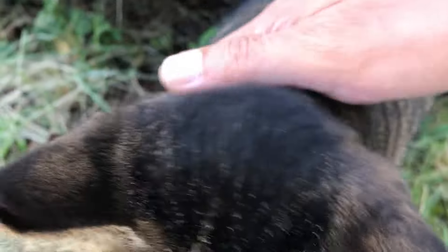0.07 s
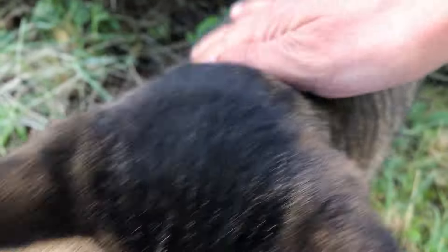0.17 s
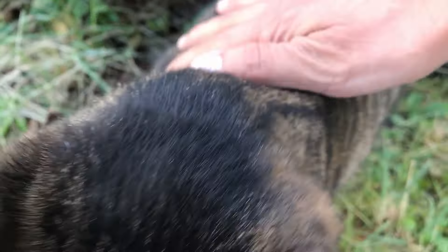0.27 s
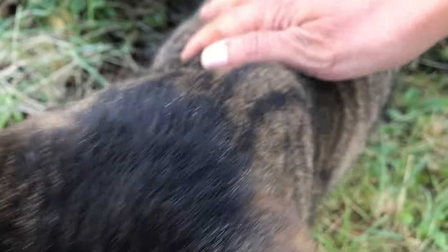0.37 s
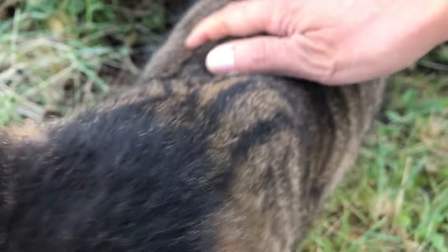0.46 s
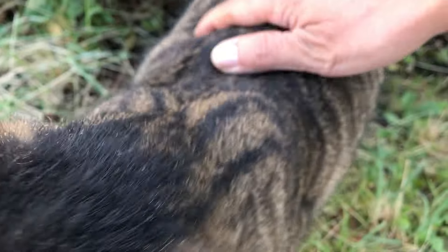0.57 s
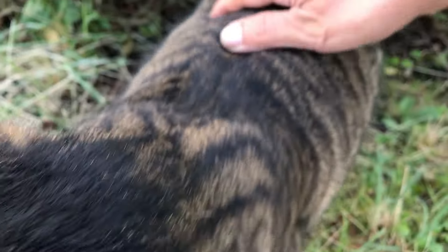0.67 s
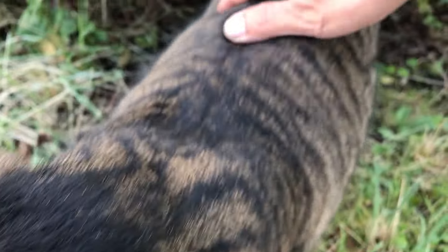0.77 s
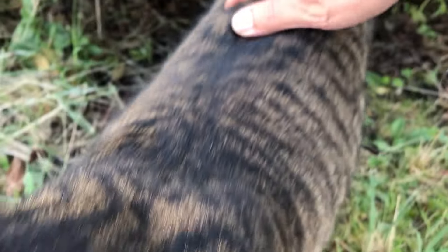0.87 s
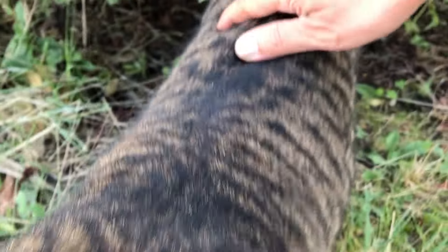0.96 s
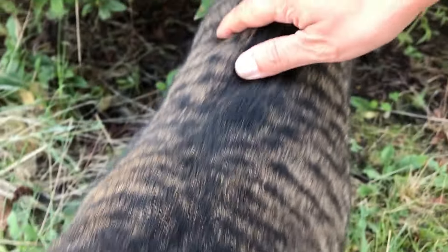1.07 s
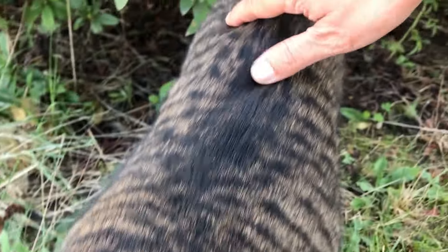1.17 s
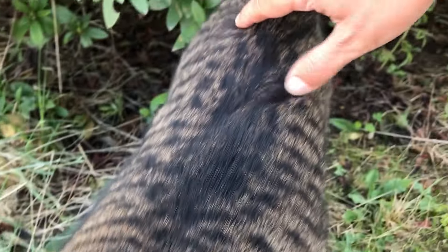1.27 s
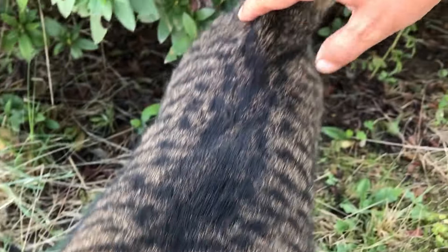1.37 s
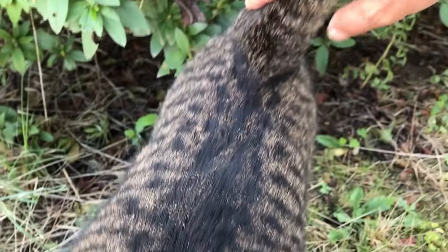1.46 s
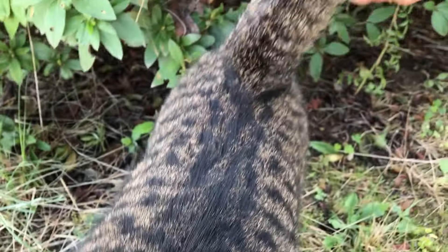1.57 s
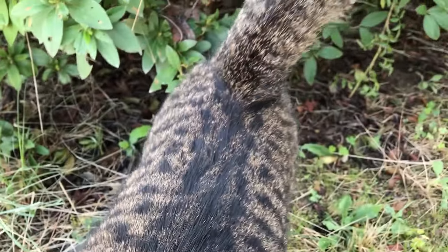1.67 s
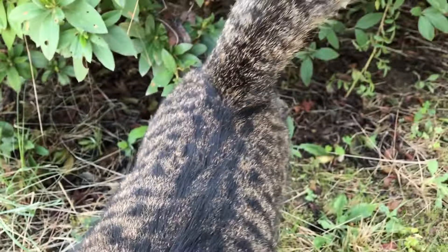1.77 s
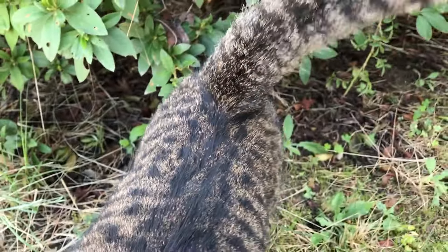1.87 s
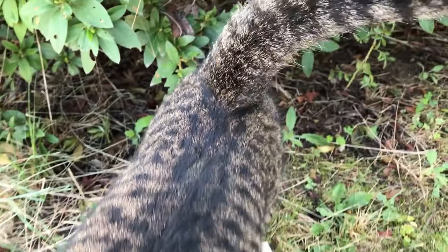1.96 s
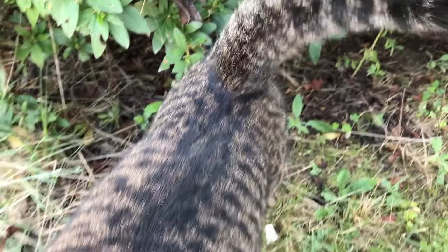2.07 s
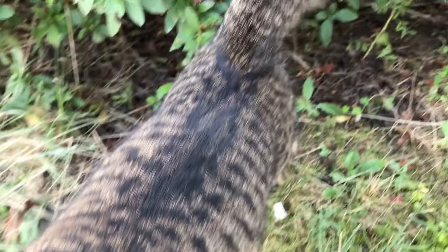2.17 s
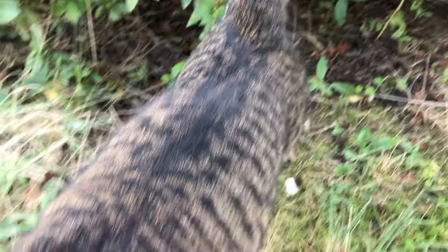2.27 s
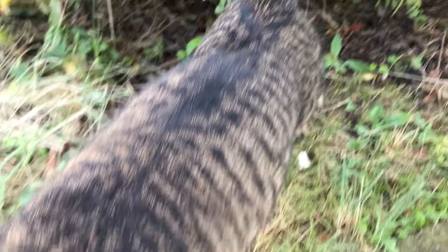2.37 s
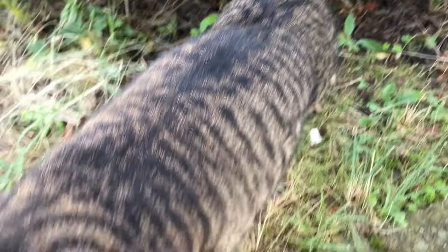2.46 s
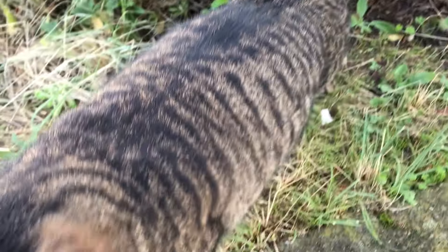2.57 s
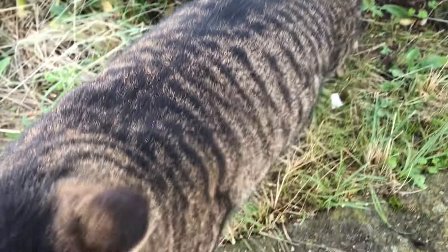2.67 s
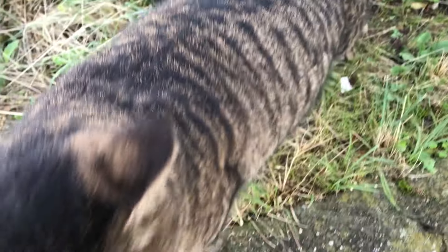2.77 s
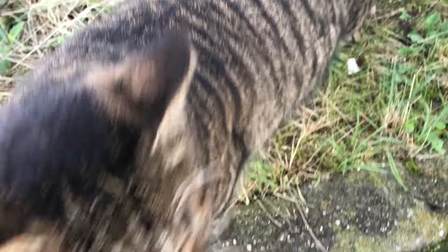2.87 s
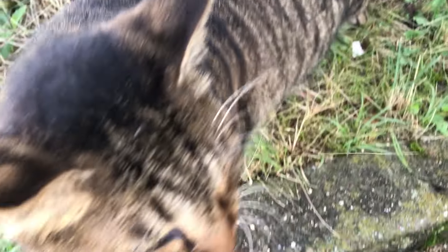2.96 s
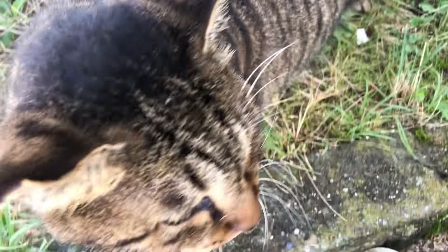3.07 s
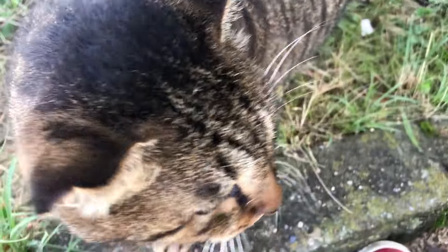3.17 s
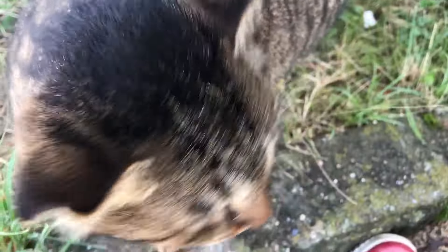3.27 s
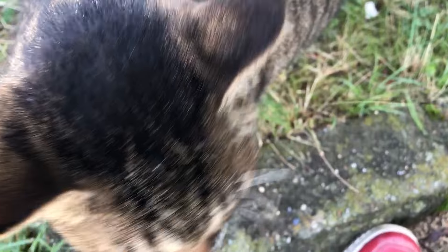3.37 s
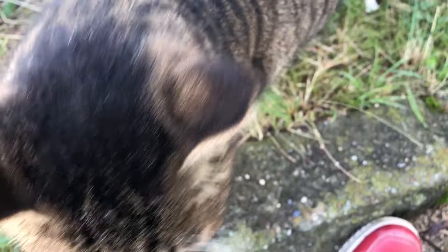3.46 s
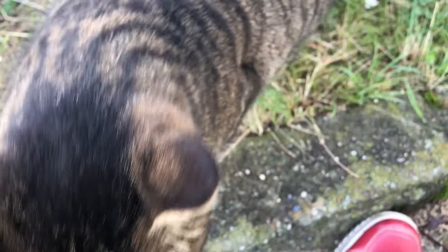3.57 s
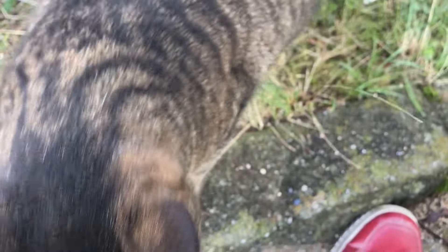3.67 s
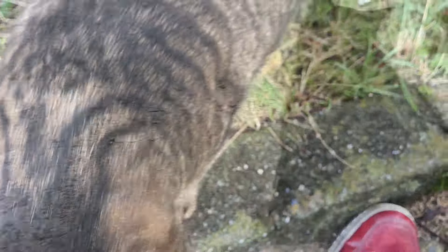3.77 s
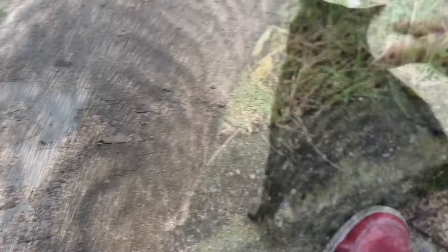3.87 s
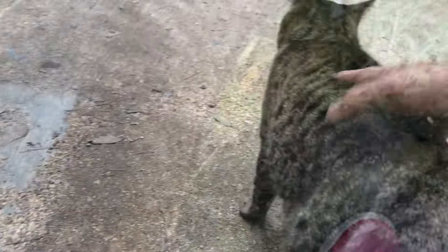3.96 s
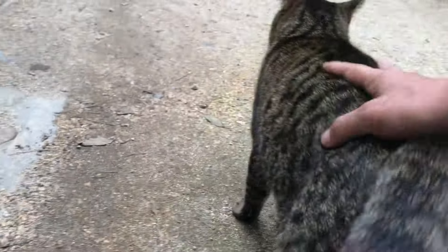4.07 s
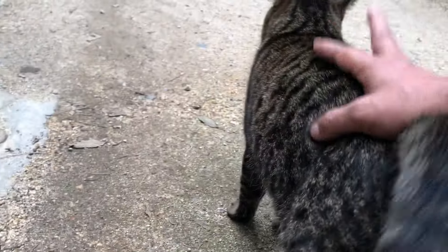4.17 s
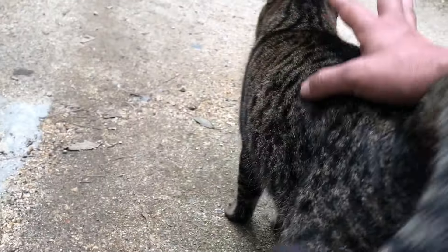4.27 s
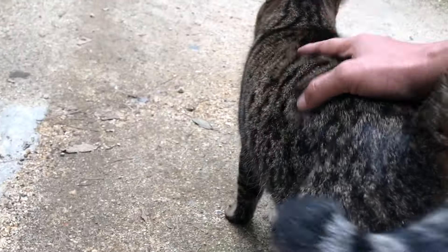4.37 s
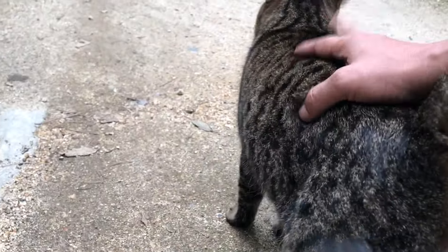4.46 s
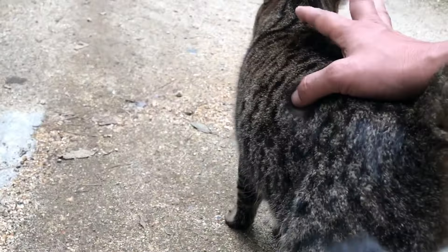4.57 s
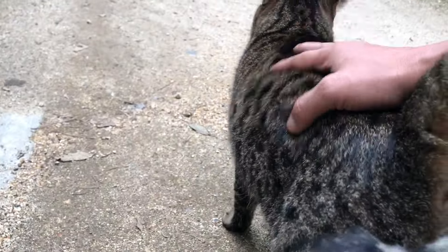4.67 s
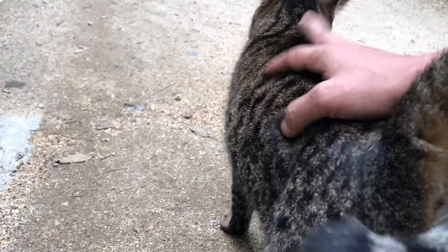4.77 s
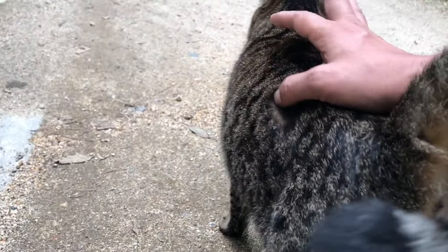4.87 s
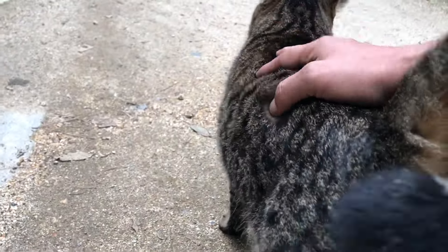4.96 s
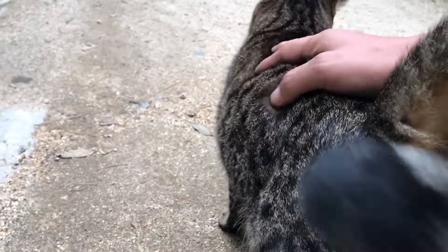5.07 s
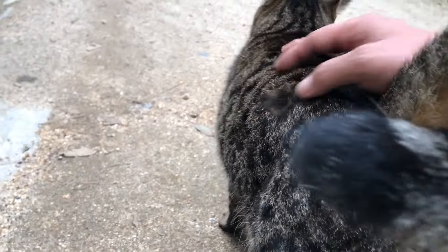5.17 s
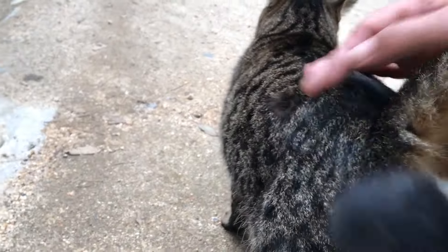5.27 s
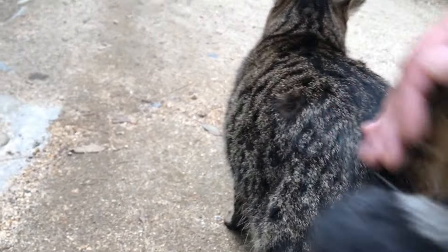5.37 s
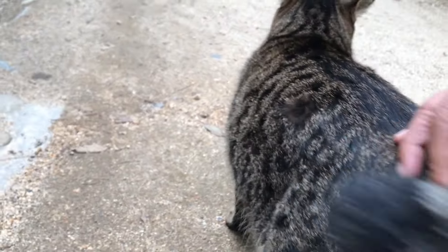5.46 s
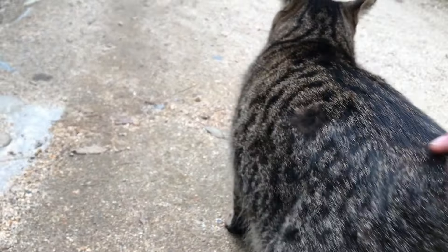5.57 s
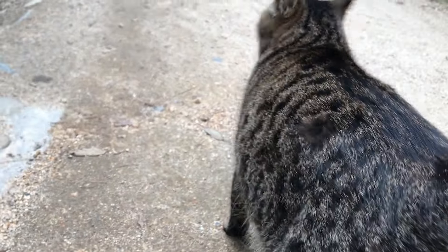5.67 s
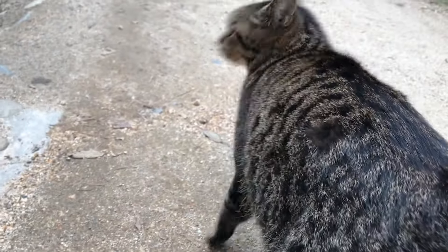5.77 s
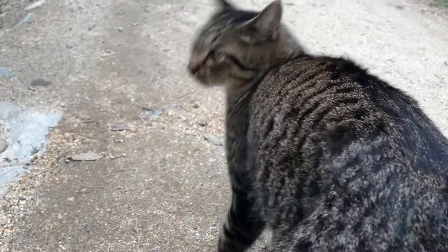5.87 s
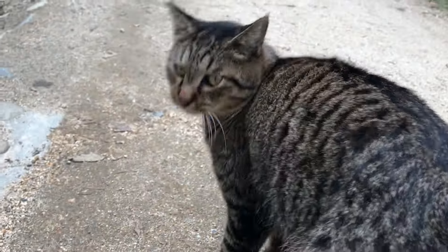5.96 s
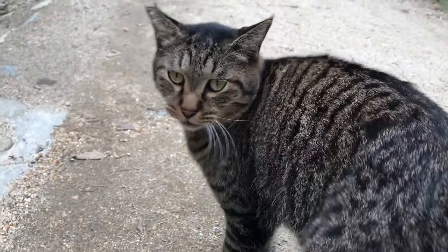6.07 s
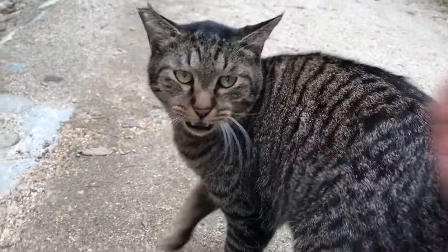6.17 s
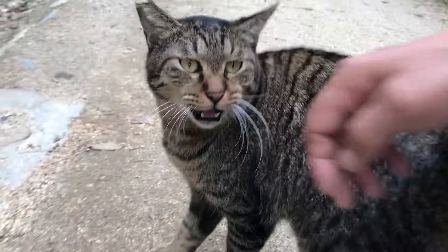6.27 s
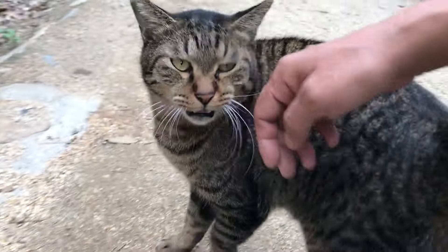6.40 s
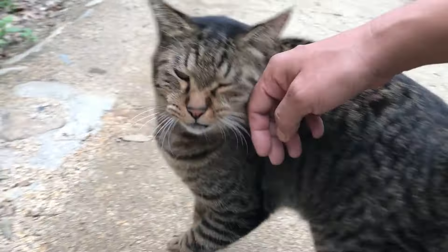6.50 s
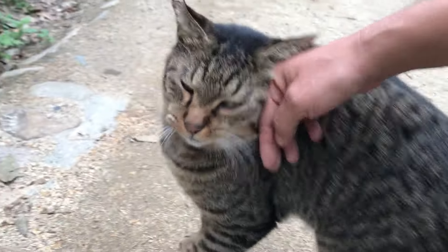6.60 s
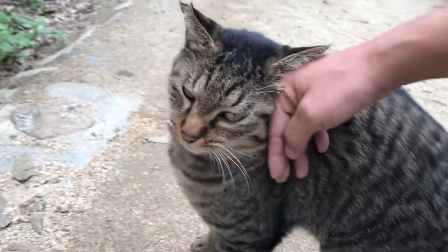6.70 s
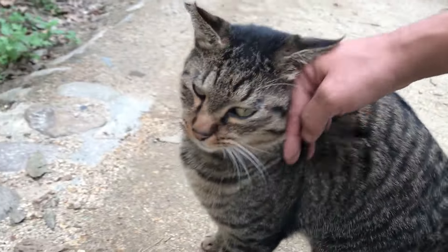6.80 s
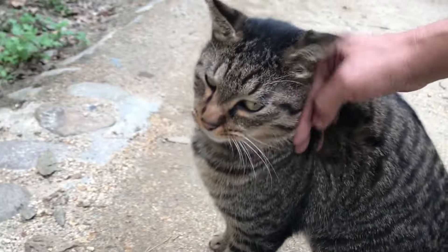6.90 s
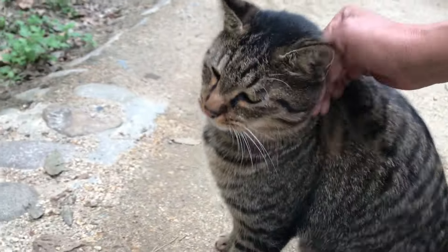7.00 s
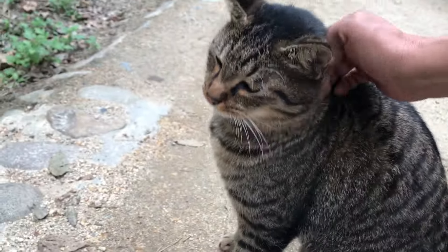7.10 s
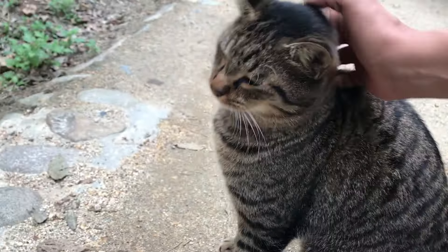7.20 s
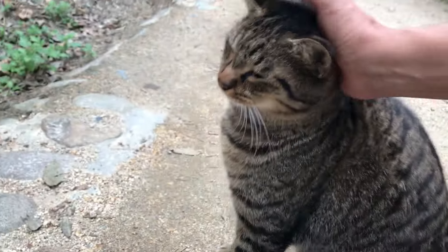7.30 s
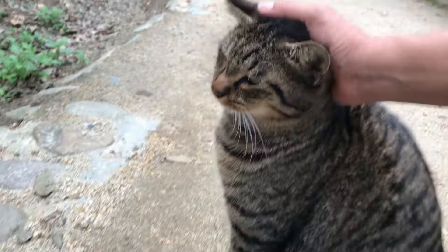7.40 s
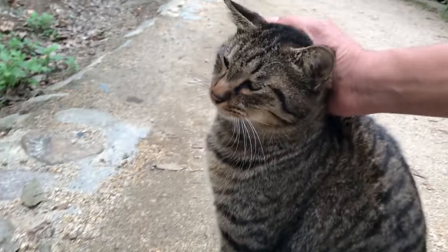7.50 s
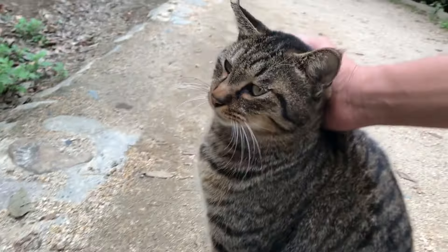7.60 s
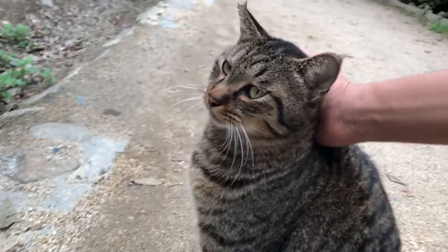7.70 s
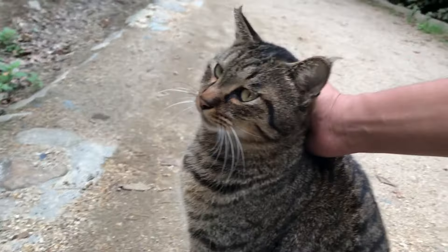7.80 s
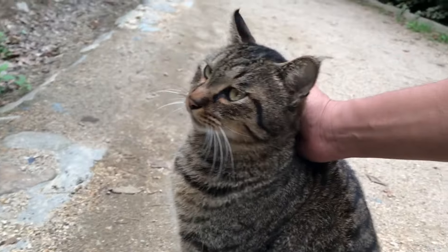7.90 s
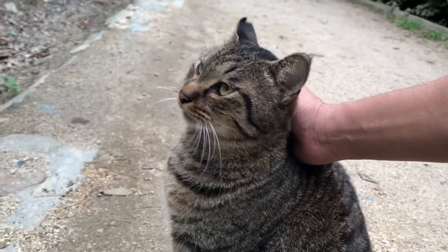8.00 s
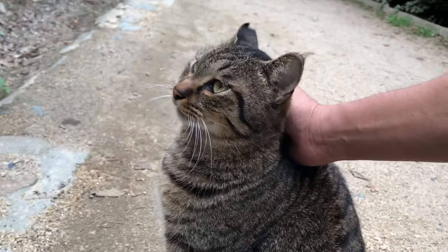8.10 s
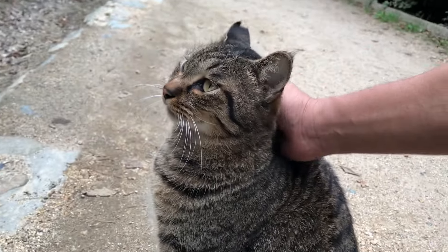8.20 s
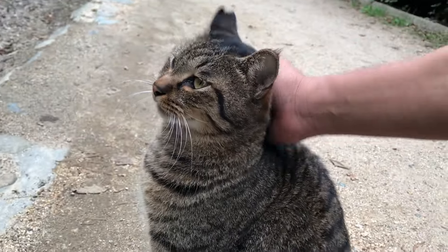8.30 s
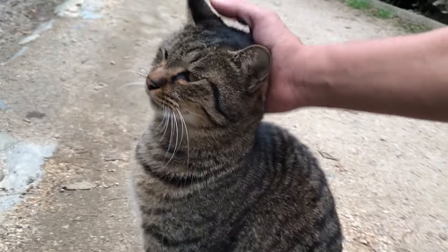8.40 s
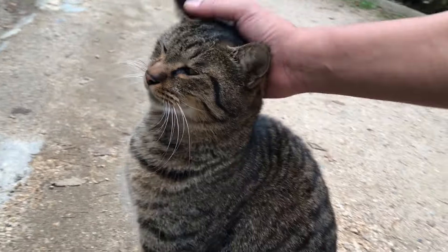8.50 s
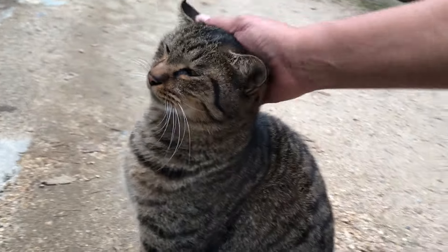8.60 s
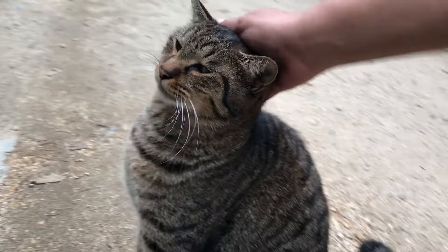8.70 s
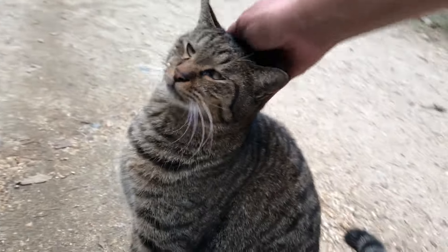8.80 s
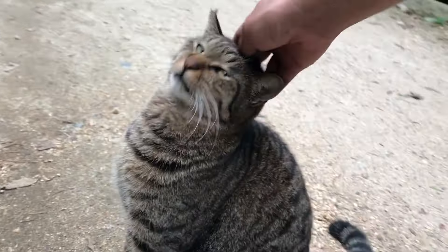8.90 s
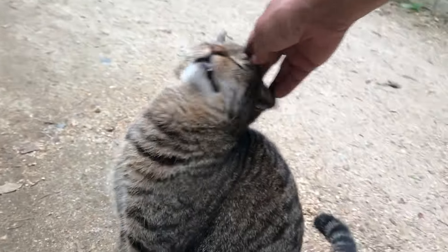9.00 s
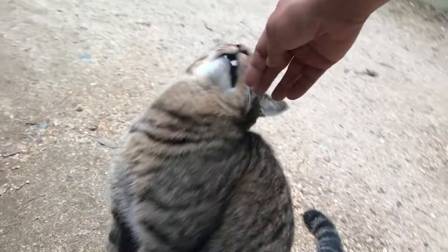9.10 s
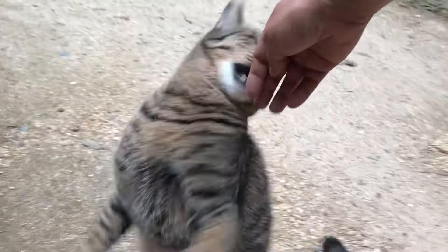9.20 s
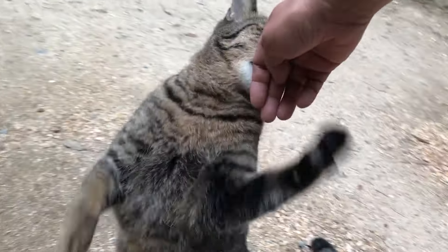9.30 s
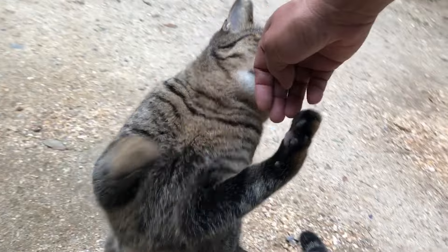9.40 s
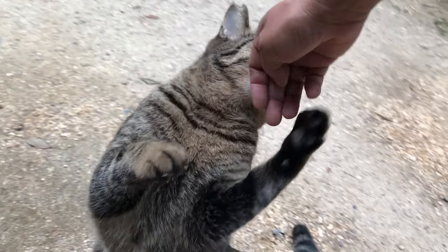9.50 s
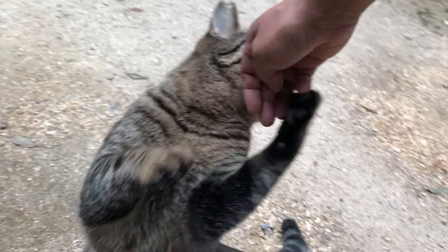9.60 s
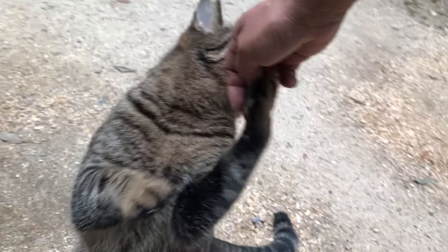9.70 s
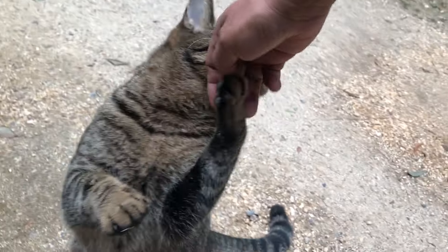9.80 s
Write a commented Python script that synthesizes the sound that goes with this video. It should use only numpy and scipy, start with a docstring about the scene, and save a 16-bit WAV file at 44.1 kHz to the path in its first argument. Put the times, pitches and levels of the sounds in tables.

```python
"""A cat meows close to a phone on a grass verge, over distant traffic, while a hand strokes it and stalks rustle.
Far insects chirp as narrow noise before and into the second, longest call, which has a brief early trill.
Between 3.5 and 4 s the background turns to a gravel path; grit crunches as gated noise and snaps, densest near 4.5 s.
A third, trilled call follows near 6 s, then more crunches and snaps to the end.
Each call is a harmonic stack shaped by a mouth that opens and closes, roughened by breath noise."""
import sys
import numpy as np
from scipy import signal
from scipy.fft import rfft, irfft
from scipy.io import wavfile
from scipy.ndimage import uniform_filter1d

SR = 44100
rng = np.random.default_rng(int(sys.argv[2]) if len(sys.argv) > 2 else 0)


def generate_wav(signal):
    """Clip the signal to [-1, 1] and save it as 16-bit WAV at the path in sys.argv[1]."""
    frames = np.transpose(np.atleast_2d(signal))
    scaled = np.clip(frames, -1, 1) * 32767
    pcm = np.round(scaled).astype(np.int16)
    wavfile.write(sys.argv[1], SR, pcm)


N = 434385

# Colour of the verge background: (frequency [Hz], relative level per Hz [dB])
VERGE_COLOUR = [(15, -34), (25, 9.5), (74, 3.5), (293, -4.5), (560, -12), (624, -4.5), (840, -11),
                (1400, -19.5), (2690, -23), (4030, -26.5), (10400, -37), (12900, -37.5), (16000, -42)]
# Colour of the path background: (frequency [Hz], relative level per Hz [dB])
PATH_COLOUR = [(15, -25), (25, 9), (74, 0), (180, -2), (516, -30), (677, -23), (1480, -37), (2410, -34.5),
               (2760, -46.5), (5430, -38.5), (7510, -42.5), (14800, -61), (16000, -34)]
# Far traffic, with brief low thumps of handling near 3.07 and 4.39 s, before its random wander: (time [s],
# level [dB])
RUMBLE = [(0.0, -51.5), (0.5, -60), (1.9, -55.5), (2.4, -54), (2.98, -54), (3.07, -49.5), (3.14, -52),
          (4.09, -57), (4.39, -46.5), (4.46, -51.5), (5.1, -53), (5.9, -53.5), (7.4, -54.5), (7.7, -56.5),
          (8.7, -54), (9.85, -54.5)]
# Voice path of the cat, one table a call, levels before trill and shimmer:
# (time [s], pitch [Hz], fundamental [dB], mouth resonance [Hz], mouth [dB], throat [dB],
#  third resonance [dB], fourth resonance [dB])
CALLS = [
    [(0.0, 550, -43.5, 1610, -43, -42, -52.5, -64), (0.108, 555, -43, 1610, -39.5, -38, -47, -57.5),
     (0.238, 543, -45, 1590, -45, -46.5, -56, -63), (0.34, 538.4, -46.5, 1550, -45, -49.5, -58, -76),
     (0.37, 516, -50, 1200, -43, -48, -51, -65), (0.382, 492, -51, 950, -47, -51, -55, -70),
     (0.39, 441, -43.5, 890, -42, -45, -49, -69), (0.402, 429, -43.5, 880, -46, -59, -57, -68),
     (0.415, 428.4, -75, 897, -76, -82, -74, -76)],
    [(1.975, 380, -69, 849, -78, -89, -77, -80), (1.991, 379, -45, 866, -77, -78, -83, -86),
     (2.023, 492, -55.5, 1440, -59, -77, -76, -88), (2.05, 551, -47.5, 1640, -44, -54, -72, -84),
     (2.115, 625, -50, 1760, -50, -40.5, -65, -68), (2.157, 623, -48.5, 1710, -45, -40.5, -65, -62),
     (2.253, 630, -50.5, 1830, -47, -35, -58, -63), (2.385, 595, -48, 1765, -48.5, -42, -53, -59.5),
     (2.595, 552, -47.5, 1545, -48, -42.5, -50.5, -59), (2.881, 515.4, -44, 1380, -41, -38, -43, -52.5),
     (3.119, 516.3, -44.5, 1315, -40.5, -35.5, -44, -51.5),
     (3.201, 523.7, -46, 1328, -42.5, -37.5, -51, -52.5), (3.275, 509, -47, 1290, -41, -40, -51, -54),
     (3.331, 504.3, -52, 1370, -49, -42, -63, -80), (3.405, 481, -54, 1150, -44, -46, -65, -75),
     (3.428, 497, -56, 880, -58, -46, -62, -70), (3.447, 416, -39, 858, -41, -51, -69, -68),
     (3.47, 400, -69, 847, -85, -79, -68, -72)],
    [(5.9, 423, -60, 745, -46.5, -63, -76, -79), (5.952, 386, -49, 710, -39, -70, -63, -70),
     (6.012, 445, -55, 820, -43, -70, -76, -88), (6.03, 420, -55, 800, -34.5, -67, -66, -72),
     (6.07, 464, -53, 940, -40, -48, -65, -62), (6.13, 502, -49.5, 1290, -33.5, -37.5, -56, -56),
     (6.184, 535, -45, 1460, -42.5, -30.5, -58, -52), (6.27, 519.5, -48.5, 1400, -44.5, -34.5, -47, -51),
     (6.36, 508, -50.5, 1297, -38.5, -37, -46, -54), (6.412, 469, -57, 910, -45, -37.5, -43, -60),
     (6.43, 453, -55, 850, -41, -41, -50, -62), (6.44, 407, -44, 805, -37, -45, -54, -60),
     (6.456, 383, -42.5, 760, -39, -45, -55, -58), (6.47, 350, -63, 800, -86, -65, -76, -77)],
]
# Cat's posture, one row a call:
# (air leak [ratio], third resonance mouth shut [Hz], third mouth wide [Hz], fourth resonance [Hz])
POSTURE = [(.8, 3130, 3230, 4360), (.9, 3900, 3080, 4530), (.9, 3050, 3050, 5200)]
# Fifth and sixth resonances: (centre [Hz], width [Hz], level relative to the fourth [dB])
FAINT_RESONANCES = [(8060, 1500, -26), (12200, 2300, -29)]
# Runs of trill beats, depths before each beat's random force: (first beat [s], end [s],
#  pitch swing at start [relative], pitch swing at end [relative], dip at start [dB], dip at end [dB])
TRILL_RUNS = [(2.099, 2.15, 0.0069, 0.0044, 3.9, 3.8), (5.911, 6.014, 0.065, 0.082, 33, 3.7),
              (6.082, 6.436, 0.016, 0.017, 5.5, 2.8)]
# Movements of paws, shoes and hand, layer levels at mid-scuff before the rustle's trims:
# (start [s], end [s], stalks [dB], low crunch [dB], sharp crunch [dB], swell start to end [dB])
SCUFFS = [(0, .45, -65, -76, -62, -7.5), (0.126, 0.167, -52, -78, -72, -6),
          (3.369, 3.42, -49.5, -65, -68, 10), (3.438, 3.472, -49, -62, -64, 3),
          (3.65, 3.7, -47, -75, -58, 3), (3.69, 3.786, -40.5, -60, -52, -11.5),
          (3.805, 4.057, -49.5, -62.5, -60, 6.5), (4.07, 4.129, -59, -68, -62.5, -9),
          (4.152, 4.385, -68, -55, -57, 17), (4.369, 4.483, -53, -37.5, -38, -4),
          (4.492, 4.594, -51, -38, -38, 10), (4.6, 4.701, -47.5, -42.5, -41.5, -5),
          (4.71, 4.779, -45, -39, -38.5, -1), (4.79, 4.892, -70, -53, -55, -2),
          (4.875, 5.07, -72, -54, -58, -9), (5.07, 5.325, -67, -56.5, -57.5, 4),
          (5.594, 5.678, -76, -69, -61, -4.5), (5.755, 5.777, -80, -68, -75, -3),
          (6.432, 6.466, -76, -66, -57.5, -10), (6.666, 6.722, -61, -58.5, -63, -7),
          (6.808, 6.85, -60.5, -76, -63.5, -11), (6.955, 7.07, -72, -58, -62.5, -10),
          (7.169, 7.218, -54.5, -61, -59, -16), (7.242, 7.543, -83, -68.5, -69, -1),
          (8.223, 8.35, -74, -75, -73, 5), (8.407, 9.052, -75, -66.5, -62.5, 0.5),
          (9.036, 9.157, -50.5, -59.5, -53, 1.5), (9.173, 9.298, -72, -66, -73, 6),
          (9.327, 9.364, -50, -50, -54, -16), (9.366, 9.462, -64, -53.5, -53, -6),
          (9.63, 9.721, -57.5, -54.5, -59, 0.5), (9.735, 9.847, -69, -74, -63, -1)]
# Faint steady stirring, before the rustle's trims: (time [s], stalks level [dB], grit level [dB])
STIRRING = [(0, -71.5, -102), (2.2, -76.5, -86), (3.3, -71.5, -87), (3.6, -63, -68), (5.4, -73, -68),
            (5.8, -76, -70.5), (6.3, -71.5, -69), (7.1, -71, -67), (7.65, -77, -74.5), (8.2, -77, -72.5),
            (9.85, -67, -63)]
# Single breaks of grit and stalk:
# (time [s], crack peak [dB], knock pitch [Hz], knock tone peak [dB], fizz peak [dB])
SNAPS = [(.154, -44, 604, -70, -23.5), (1.1144, -66, 627, -65, -47), (3.125, -55, 600, -70, -36),
         (3.255, -62, 608, -70, -40), (3.338, -60, 600, -70, -35), (3.395, -36, 600, -70, -30),
         (3.4717, -33, 646, -45, -23.5), (3.5357, -54, 664, -61, -36.5), (3.6528, -51, 676, -58, -31.5),
         (3.6964, -38, 590, -41, -21), (3.878, -48, 1480, -50, -49), (3.9978, -39, 1180, -53, -20),
         (4.071, -20, 1190, -23.5, -42), (4.2651, -30, 1190, -59, -53), (4.2832, -37, 999, -50, -50),
         (4.3186, -49, 1200, -36.5, -51), (4.3314, -37, 1130, -43, -40), (4.372, -24, 1170, -27, -39),
         (4.3864, -24, 845, -24, -39), (4.403, -28, 1120, -23, -42), (4.4189, -36, 1080, -18.5, -39),
         (4.507, -22.5, 770, -20, -26), (4.534, -32, 800, -32, -40), (4.547, -23, 780, -28, -32),
         (4.5604, -21, 740, -21.5, -40), (4.586, -14.5, 896, -12.5, -19), (4.654, -22.5, 800, -22.5, -40),
         (4.6664, -35, 875, -40, -37), (4.688, -28, 848, -51, -44), (4.7247, -32, 706, -32, -44),
         (4.7696, -23, 660, -29, -43), (4.8259, -35, 581, -43, -58), (4.897, -39, 840, -43, -54),
         (5.0016, -22, 1550, -22, -27.5), (5.0203, -25, 708, -33, -27), (5.0463, -27, 750, -33, -49),
         (5.0572, -39, 556, -23.5, -54), (5.1064, -41, 705, -32, -55), (5.1522, -40, 880, -33.5, -55),
         (5.216, -33.5, 805, -52, -56), (5.421, -42.5, 638, -63, -57), (5.5388, -34, 636, -44.5, -34),
         (5.655, -41.5, 598, -63, -57), (5.7642, -39, 670, -45.5, -68), (5.864, -43.5, 890, -40, -46),
         (6.244, -51, 615, -60, -34.5), (6.5415, -49, 770, -66, -35), (6.5942, -42, 651, -64, -67),
         (6.648, -58, 676, -55, -32), (6.907, -55, 700, -64, -43), (6.9664, -50, 746, -43, -53),
         (6.984, -37, 634, -38, -57), (7.002, -33, 726, -35, -35), (7.0352, -38.5, 719, -53, -30),
         (7.064, -29, 800, -41, -44), (7.171, -35, 624, -50, -62), (7.197, -40, 789, -53, -53),
         (7.33, -63, 700, -52, -42), (8.2253, -65, 824, -57, -39), (8.294, -38.5, 778, -64, -54),
         (8.334, -39.5, 800, -44, -50), (8.411, -63, 716, -65, -36.5), (8.4632, -45, 1030, -56, -62),
         (8.554, -51, 1260, -41, -60), (8.575, -45, 1470, -42.5, -61), (8.852, -50, 810, -43, -59),
         (9.0563, -32, 496, -41, -47), (9.0684, -26.5, 603, -37, -53), (9.1162, -30, 1070, -59, -59),
         (9.1508, -32, 980, -43, -56), (9.329, -23, 625, -34, -59), (9.35, -34, 600, -50, -45),
         (9.3678, -28.5, 660, -21.5, -55), (9.461, -42, 619, -52, -59), (9.7941, -34, 807, -63, -56)]
# Insect chirps, levels before the soft edges: (start [s], end [s], centre [Hz], width [Hz], level [dB])
INSECTS = [(.9, 1.28, 4200, 400, -73), (1.92, 2.12, 3850, 450, -72), (.805, .845, 6250, 150, -77),
           (1.375, 1.415, 6250, 150, -79), (1.96, 2.0, 6250, 150, -75)]

MOVE_S = (3.5, 4.05)  # crossfade from verge to path
VERGE_DB, PATH_DB = -61.5, -64.5  # hush of the air at each place
HUM_HZ, HUM_DB = 70.2, -3.5  # a far engine heard from the path, dB relative to the path's bass
MOUTH_Q, THROAT_WIDTH_HZ = 2.76, 867  # mouth: centre over width
THIRD_WIDTH_HZ, FOURTH_WIDTH_HZ = 1010, 1500
MOUTH_SHUT_HZ, MOUTH_WIDE_HZ = 850, 1700
THROAT_SHUT_HZ, THROAT_WIDE_HZ = 2127, 2307
TRACT_TOP_HZ = 6300  # the four main resonances die away above this
FOLD_SLOPE_DB = 9  # fall of the bare fold pulses, times octaves squared
TRILL_BEAT_S, TRILL_JITTER_S, TRILL_SPREAD_DB = 0.033, 0.003, 3.5
SCUFF_ATTACK_S, SCUFF_RELEASE_S = 0.0052, 0.022
SNAP_T60_S = 0.013  # time for a snap's crack to fall 60 dB
TOP_HZ = 15900  # upper edge of the phone's pass band


def undb(db):
    """Turn decibels into amplitude."""
    return 10 ** (np.asarray(db) / 20)


def unit(x):
    """Scale a signal to rms 1."""
    return x / np.sqrt(np.mean(x ** 2))


def band(x, lo_hz, hi_hz, order=2):
    """Pass only the band between two frequencies."""
    return signal.sosfilt(signal.butter(order, [lo_hz, hi_hz], "band", fs=SR, output="sos"), x)


def walk(rate, size=N):
    """Random levels held 1 / rate s and slewed twice; spread near 1."""
    hold = int(SR / rate)
    steps = np.repeat(rng.standard_normal(size // hold + 1), hold)
    smooth = uniform_filter1d(uniform_filter1d(steps, hold), hold)
    return 1.84 * smooth[:size]


def columns(table, t):
    """Glide through a table's columns at times t."""
    s, *rest = np.transpose(table)
    return [np.interp(t, s, column) for column in rest]


def distance(colour):
    """Far noise of a given colour, split into bass and a rest that flickers; each rms 1."""
    hz, level_db = np.transpose(colour)
    f = np.fft.rfftfreq(N, 1 / SR) + 1
    spectrum = rfft(rng.standard_normal(N)) * undb(np.interp(np.log(f), np.log(hz), level_db))
    bass = irfft(spectrum / (1 + (f / 270) ** 6), N)
    rest = irfft(spectrum, N) - bass
    return unit(bass), unit(rest * undb(1.0 * walk(6)))


def surroundings():
    """Traffic rumble with a few low handling thumps, and the hush of the air, crossfaded at equal power from
    verge to path."""
    t = np.arange(N) / SR
    path = np.interp(t, MOVE_S, [0, 1])
    verge_gain, path_gain = np.sqrt(1 - path), np.sqrt(path)
    verge_bass, verge_hush = distance(VERGE_COLOUR)
    path_bass, path_hush = distance(PATH_COLOUR)
    hum = undb(HUM_DB) * unit(band(rng.standard_normal(N), HUM_HZ - 5, HUM_HZ + 5))
    rumble = verge_gain * verge_bass + path_gain * (path_bass + hum)
    rumble *= undb(columns(RUMBLE, t)[0] + 1.03 * walk(12))
    return rumble + verge_gain * verge_hush * undb(VERGE_DB) + path_gain * path_hush * undb(PATH_DB)


def peak(hz, centre_hz, width):
    """Power response of a steep resonance, 1 at the centre."""
    return (1 + ((hz / centre_hz - centre_hz / hz) * centre_hz / width) ** 2) ** -3


def trill(t, swing_s=0.0067, dip_s=0.0024):
    """At each beat, never quite even, the pitch climbs, then drops through a short dip in level."""
    bend, dip_db = np.ones(len(t)), np.zeros(len(t))
    for start, end, first_swing, last_swing, first_db, last_db in TRILL_RUNS:
        for beat in np.arange(start, end, TRILL_BEAT_S):
            late, force = rng.uniform(-1.2, 1, 2)
            s, force = beat + TRILL_JITTER_S * late, undb(TRILL_SPREAD_DB * force)
            swing = force * np.interp(s, [start, end], [first_swing, last_swing])
            depth_db = force * np.interp(s, [start, end], [first_db, last_db])
            u = (t - s) / swing_s
            bend -= swing * 2.3 * u * np.exp(-u ** 2 / 2)
            dip_db -= depth_db * np.exp(-((t - s) / dip_s) ** 2 / 2)
    return bend, dip_db


def meow(table, hoarse, third_shut_hz, third_wide_hz, fourth_hz, count=27):
    """Harmonics of the fold pulses through moving resonances; breath noise roughens the upper ones."""
    a, b = int(table[0][0] * SR), int(table[-1][0] * SR)
    size = b - a
    t = np.arange(a, b) / SR
    hz, first_db, mouth_hz, mouth_db, throat_db, third_db, fourth_db = columns(table, t)
    mouth_range = [MOUTH_SHUT_HZ, MOUTH_WIDE_HZ]
    throat_hz = np.interp(mouth_hz, mouth_range, [THROAT_SHUT_HZ, THROAT_WIDE_HZ])
    third_hz = np.interp(mouth_hz, mouth_range, [third_shut_hz, third_wide_hz])
    # folds that slacken fast, as the pitch falls, lose their clean overtones
    pitch_slope = np.gradient(np.log(uniform_filter1d(hz, 400)), t)
    slack = np.clip(-pitch_slope / 2.5 - .4, 0, 1)
    bend, dip_db = trill(t)
    hz = hz * bend * (1 + .0025 * walk(35, size) + .003 * hoarse * walk(110, size))
    phase = 2 * np.pi * np.cumsum(hz) / SR
    resonances = [(mouth_hz, mouth_hz / MOUTH_Q, mouth_db), (throat_hz, THROAT_WIDTH_HZ, throat_db),
                  (third_hz, THIRD_WIDTH_HZ, third_db), (fourth_hz, FOURTH_WIDTH_HZ, fourth_db)]
    # a harder call, richer in overtones, also leaks more air
    leak = hoarse * np.clip((fourth_db + 75) / 25, .5, 1)
    breath = (leak + slack) * undb(2.5 * walk(60, size) + dip_db)
    air = band(rng.standard_normal((count, size)), 20, 410)
    voice = -undb(first_db + dip_db) * np.cos(phase)
    for k in range(2, count):
        f = k * hz
        power = undb(first_db - FOLD_SLOPE_DB * np.log2(k) ** 2) ** 2
        tract = sum(undb(db) ** 2 * peak(f, centre, width) for centre, width, db in resonances)
        power += tract / (1 + (f / TRACT_TOP_HZ) ** 20)
        power += sum(undb(fourth_db + db) ** 2 * peak(f, centre, width)
                     for centre, width, db in FAINT_RESONANCES)
        smear = unit(air[k]) * np.minimum(breath * min(.04 * (k / 4) ** 2.5, .5), .8)
        # overtones waver more than the fundamental; the higher ones dip deeper at a trill beat
        waver_db = min(.25 * k, 3) * walk(30, size)
        beat_db = dip_db * min(.6 + k / 8, 2)
        shimmer = undb(waver_db + beat_db - slack * min(2 * (k - 2), 11))
        voice -= (shimmer + smear) * np.sqrt(power) * np.cos(k * phase - .16 * (k - 1) ** 1.5)
    # a call that begins at time zero is already sounding, so it has no fade-in
    since_start = (t - t[0]) if a else 1
    fade = np.clip(np.minimum(since_start, t[-1] - t) / 0.0086, 0, 1)
    out = np.zeros(N)
    out[a:b] = np.sqrt(2) * voice * fade
    return out


def grains(rate, spread_db, tail_s, bed):
    """Noise gated by many tiny breaks of very unequal size over a bed of rubbing."""
    sizes = undb(spread_db * np.minimum(rng.exponential(size=N), 4))
    hits = (rng.random(N) < rate / SR) * sizes
    tail = np.exp(-1 / (tail_s * SR))
    breaks = unit(signal.lfilter([1], [1, -tail], hits))
    return rng.standard_normal(N) * (bed + breaks)


def movement():
    """Gains of stalks, low and sharp crunch: scuffs rise, swell or fade, and stop, over the stirring."""
    t = np.arange(N) / SR
    stalks_db, grit_db = columns(STIRRING, t)
    power = undb([stalks_db, grit_db, grit_db]) ** 2
    for start, end, *layers_db, swell_db in SCUFFS:
        a, b = int(start * SR), int((end + SCUFF_RELEASE_S) * SR)
        attack = (t[a:b] - start) / SCUFF_ATTACK_S
        release = 1 + (end - t[a:b]) / SCUFF_RELEASE_S
        edge = np.clip(np.minimum(attack, release), 0, 1)
        course = edge * undb(swell_db * ((t[a:b] - start) / (end - start) - .5))
        power[:, a:b] += (undb(layers_db)[:, None] * course) ** 2
    return np.sqrt(power)


def rustle():
    """Stalks hiss bright and dense, grit crackles low and hollow; both break in the same bursts."""
    patchy = undb(1.2 * walk(40))
    fine = grains(600, 4.0, 0.002, 0.6) * patchy
    coarse = grains(300, 4.9, 0.0014, 0.81) * patchy
    stalks = band(fine + 0.18 * coarse, 2330, 16600)
    # the stalks' level is anchored to their bright band
    stalks /= np.std(band(stalks, 7400, 12900)) * undb(3.5)
    low = 0.76 * unit(band(coarse, 206, 1380) + 0.61 * band(coarse, 730, 1390))
    sharp = 1.21 * unit(band(coarse + 0.19 * fine, 1156, 2910, order=1))
    return (np.array([stalks, low, sharp]) * movement()).sum(axis=0)


def snaps(size=2000):
    """Each snap: a sharp tick, a crack and a fizz of fading noise and a short hollow knock."""
    s, crack_db, knock_hz, knock_db, fizz_db = np.transpose(SNAPS)[:, :, None]
    t = np.arange(size) / SR
    noise = rng.standard_normal((len(SNAPS), size))
    fade = np.exp(-np.log(1000) * t / SNAP_T60_S)
    burst = noise * fade - 3.4 * (t == 0)  # the tick is one sample
    crack, fizz = band(burst, 1340, 6600), band(burst, 4100, 22000)
    crack *= undb(crack_db) / abs(crack).max(axis=1, keepdims=True)
    fizz *= undb(fizz_db) / abs(fizz).max(axis=1, keepdims=True)
    body = 0.29 * unit(band(noise, 170, 2300)) * fade ** 0.46  # noise that rings longer than the tone
    knock = undb(knock_db) * (body - np.sin(2 * np.pi * knock_hz * t) * fade)
    out = np.zeros(N + size)
    for start, snap in zip((s[:, 0] * SR).astype(int), crack + fizz + knock):
        out[start:start + size] += snap
    return out[:N]


def insects():
    """Far chirps: narrow noise, softly switched."""
    out = np.zeros(N)
    for start, end, hz, width, db in INSECTS:
        a, b = int(start * SR), int(end * SR)
        gate = signal.windows.tukey(b - a, .3)
        chirp = unit(band(rng.standard_normal(b - a), hz - width / 2, hz + width / 2))
        out[a:b] += gate * undb(db) * chirp
    return out


def scene():
    """Layer the background, the cat, the rustle and crunch, the snaps and the insects."""
    cat = sum(meow(table, *posture) for table, posture in zip(CALLS, POSTURE))
    return (surroundings() + cat + rustle() + snaps() + insects())[None]


def record(dry):
    """The phone drops the deepest bass and cuts the top."""
    dry = signal.sosfilt(signal.butter(4, 45, "high", fs=SR, output="sos"), dry)
    return signal.sosfilt(signal.ellip(10, .2, 70, TOP_HZ, fs=SR, output="sos"), dry)


dry = scene()
out = record(dry)
generate_wav(out)
```